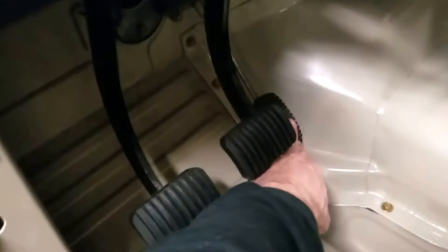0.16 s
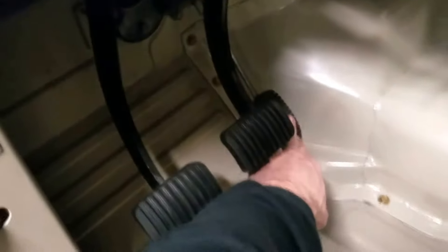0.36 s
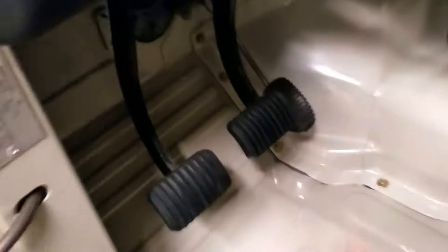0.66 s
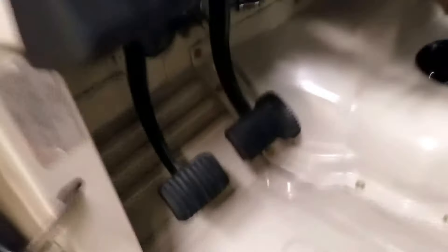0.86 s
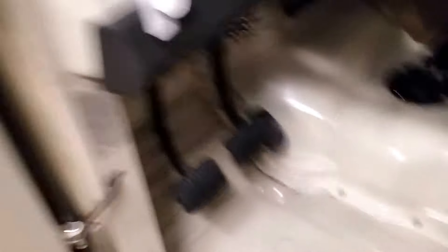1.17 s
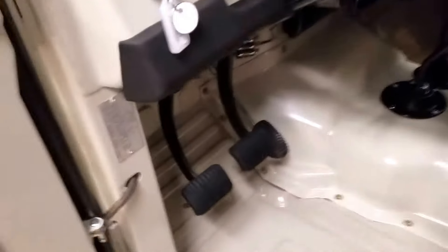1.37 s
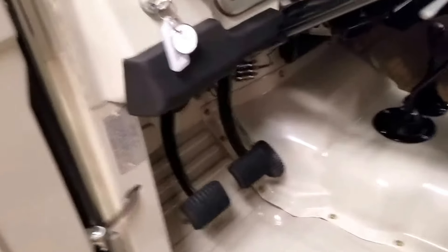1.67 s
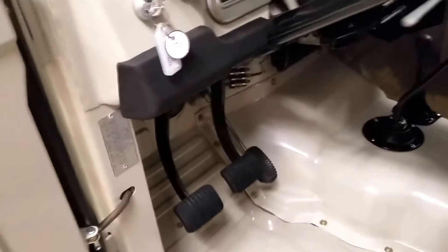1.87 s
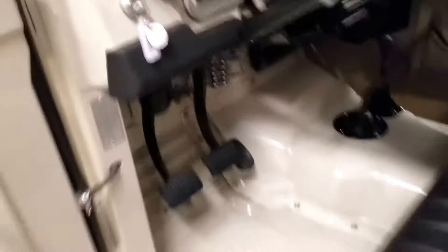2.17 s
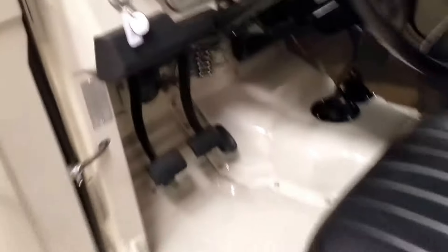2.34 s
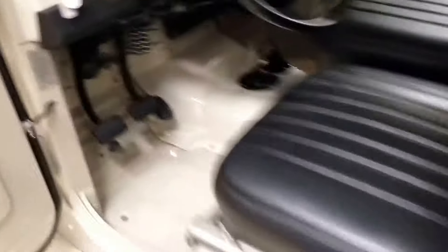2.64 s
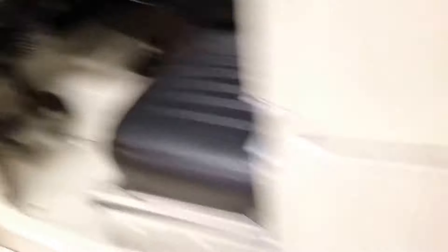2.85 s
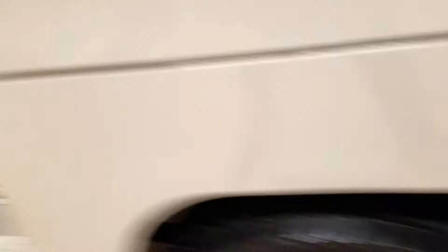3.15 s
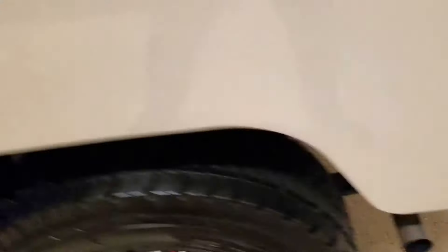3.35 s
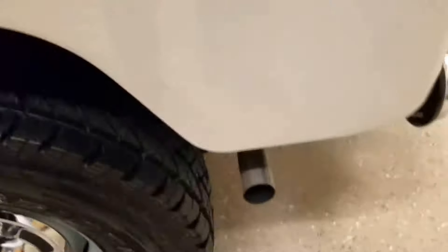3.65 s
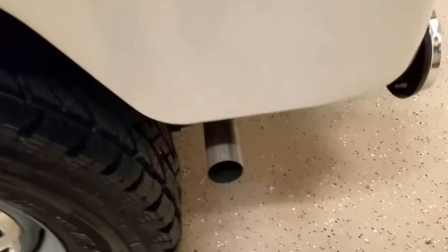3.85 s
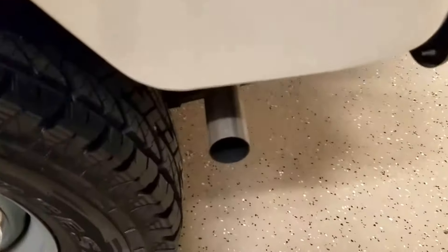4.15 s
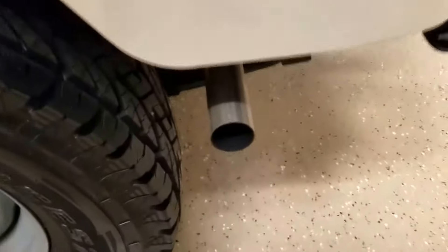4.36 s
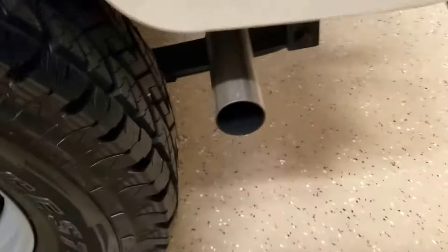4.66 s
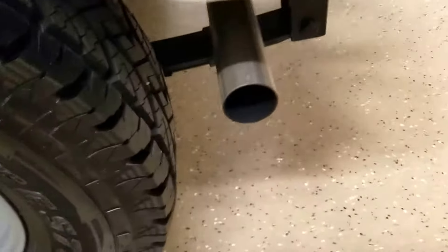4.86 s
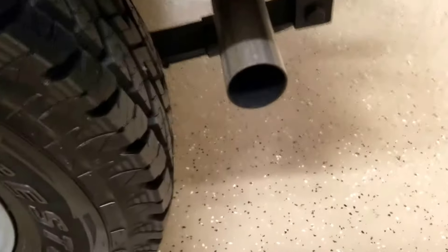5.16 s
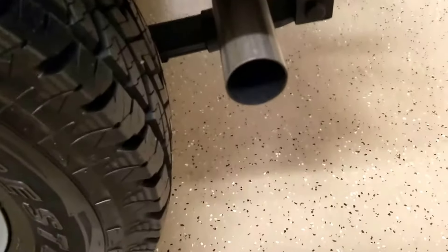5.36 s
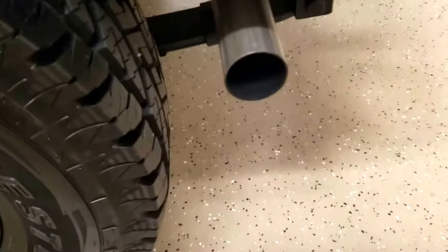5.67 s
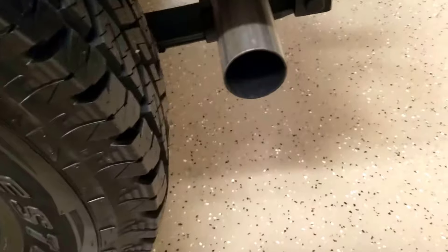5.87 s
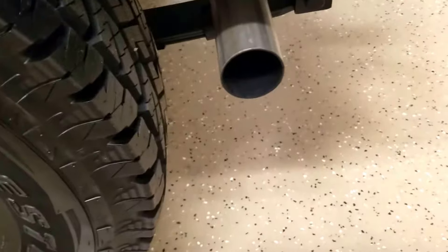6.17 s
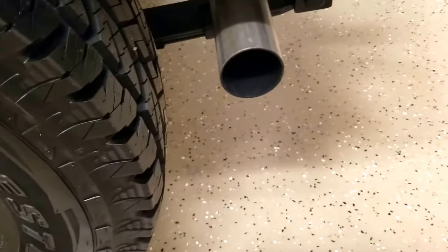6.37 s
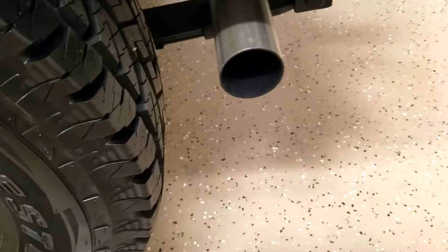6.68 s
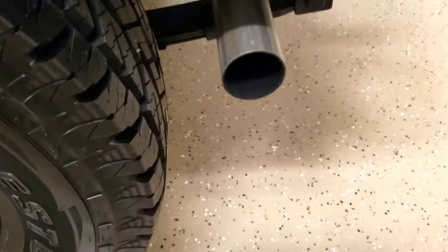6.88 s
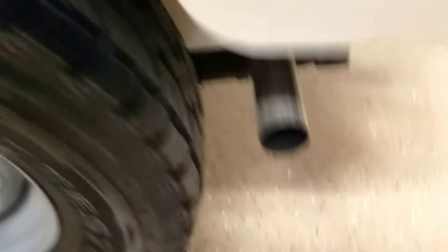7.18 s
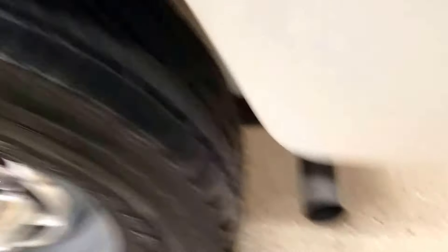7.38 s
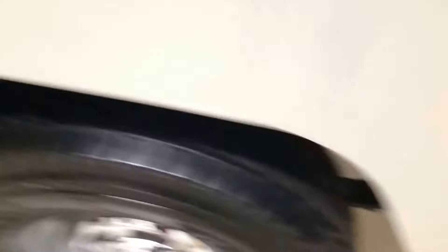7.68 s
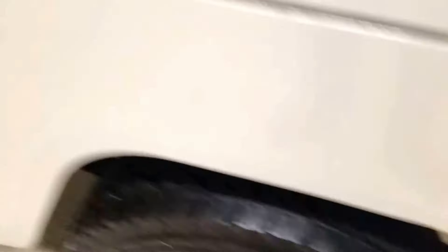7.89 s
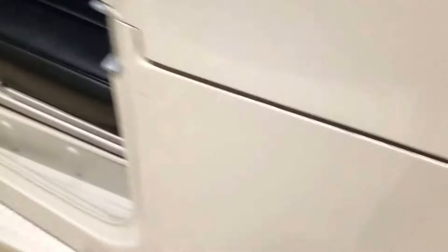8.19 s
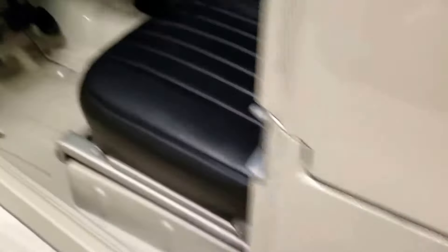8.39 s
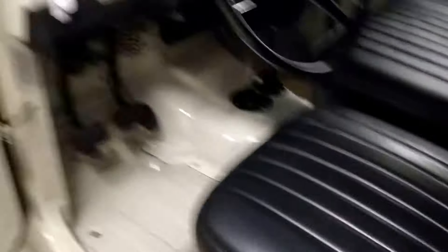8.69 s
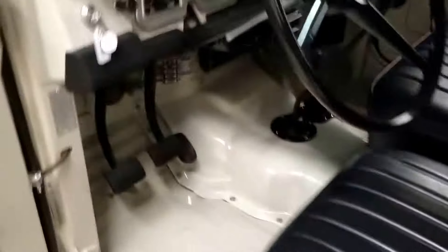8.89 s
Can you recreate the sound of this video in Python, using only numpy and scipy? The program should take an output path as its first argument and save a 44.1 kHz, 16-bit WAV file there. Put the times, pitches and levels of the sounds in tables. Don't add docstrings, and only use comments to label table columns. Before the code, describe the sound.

A hand-held stereo microphone starts in the footwell of a vehicle parked in a garage. The six-cylinder petrol engine is just above idle, then from 0.1 s revs sharply, peaking near 0.57 s with deep cabin boom, intake roar and bright air hiss. A slight dab at 0.8 s barely slows the fall; the note sags with a few weak, stumbling beats and settles to idle by about 1.7 s. As the microphone backs out, valve clatter, a fuzzy fan hum and faint alternator whine show. From 3.3 s the exhaust opens up: fast uneven puffs, hollow and whistling, with hiss and tinny shield ticks, sputtering near 3, 5 and 5.7 s. It is closest, fullest and steady from 5 to 7 s. After 7.2 s it turns away, the hiss dulls behind the body, and by 9 s the idle is more distant and clattery.

```python
import sys
import numpy as np
from scipy import signal
from scipy.fft import rfft, irfft, next_fast_len
from scipy.io import wavfile
from scipy.ndimage import map_coordinates

SR = 44100
rng = np.random.default_rng(int(sys.argv[2]) if len(sys.argv) > 2 else 0)


def generate_wav(signal):
    frames = np.transpose(np.atleast_2d(signal))
    scaled = np.clip(frames, -1, 1) * 32767
    pcm = np.round(scaled).astype(np.int16)
    wavfile.write(sys.argv[1], SR, pcm)


def volts_from_decibels(level):
    exponent = np.asarray(level, float) / 20
    return 10 ** exponent


N = 398223
TIME = np.arange(N) / SR
LEFT_RIGHT = np.array([[0.5], [-0.5]])

CYLINDER_DB = [5.5, -1.5, 5, 4, 2, 4.5]


def exhaust(fired, now):
    # (crankshaft order [cycles per turn], level beside the body [dB], level at the pipe [dB])
    boom_orders = [(4, -28, -13), (8, -35, -23), (9.5, -45, -35), (10, -17, -11), (11, -30, -14),
                   (12, -5.5, -4.5), (12.5, -38, -43), (13, -15, -4), (13.5, -26, -15), (14, -1, 0),
                   (14.5, -31, -39), (15, -2, -8.5), (15.5, -34, -43), (16, -3.5, -13), (17, -9.5, -28),
                   (18, -18, -13), (19, -25, -18), (20, -31, -23), (21, -42, -11.5), (22, -24, -18),
                   (24, -55, -27), (29, -26, -13.5), (30, -48, -13), (31, -50, -23), (33.5, -74, -46)]
    # (frequency [Hz], level per Hz [dB])
    rumble_spectrum = [(30, -22), (45, -1), (100, -37), (200, 11), (260, -1), (330, -5), (430, -5.5),
                       (600, -35.5), (900, -56)]
    shaft = 2 * np.pi * fired / 3
    near = now["aim"]
    low_db = multiples(now)
    low = volts_from_decibels(low_db[0]) * np.cos(3 * shaft)
    low += volts_from_decibels(low_db[1] + 0.4 * wobble(9)) * np.cos(6 * shaft + 1.1 * (1 - near))
    low -= volts_from_decibels(low_db[2] + 0.4 * wobble(9)) * np.cos(9 * shaft + 1.1 * (1 - near) - 0.3)

    boom = np.zeros(N)
    for order, far_db, near_db in boom_orders:
        if order % 3 == 0:
            phase = np.pi + 0.4 - 0.9 * near
        else:
            phase = 1.1 * (order - 14) - near + np.pi * (6 < order < 11.5)
        level = volts_from_decibels(far_db + near * (near_db - far_db) + 0.8 * wobble(7))
        boom += level * np.cos(order * shaft + phase + 0.12 * wobble(6))

    rumble = coloured(noise_pair(0), lambda hz: volts_from_decibels(along(rumble_spectrum, hz)), lean=0)
    boom_db = -18.5 + now["silencer_db"]
    rumble_db = -26.275 + 0.65 * now["silencer_db"]
    return np.sqrt(2) * (low + volts_from_decibels(boom_db) * boom) + volts_from_decibels(rumble_db) * rumble


def multiples(now):
    # (frequency [Hz], width [Hz], level [dB])
    footwell = [(43, 4.7, -13.5), (52.4, 6, -14), (70.4, 34, -8), (140.7, 16.5, -9), (255.7, 17, -4)]
    # (frequency [Hz], width [Hz], level [dB])
    bulkhead = [(63, 18, -4), (107, 17, -8.5), (158.7, 15, -9.5)]
    load_db = [-5.5, 0.5, -7.5]
    # (level at 1 m [dB], fall with distance [1 = spherical])
    outdoors = [(-17, 0.92), (-17.5, 1.26), (-17, 0.77)]
    # (time [s], length [s], level [dB])
    stumbles = [
        (.63, .035, -13),
        (.84, .03, -12),
        (.96, .07, -15),
        (1.23, .04, -6),
    ]
    throttle, inside = now["throttle"], now["inside"]
    levels = []
    for k, (db, fall) in enumerate(outdoors, 1):
        hz = k * now["rate"]
        cab = ring_size(footwell, hz) * volts_from_decibels(load_db[k - 1] * throttle) + 0.0053
        if k < 3:
            cab = cab + throttle ** 2 * ring_size(bulkhead, hz)
        cab_db = 20 * np.log10(cab) + 3 * (1 - 0.47 * throttle) * wobble(19)
        if k == 1:
            cab_db = cab_db + bumps(stumbles)
        levels.append(inside * cab_db + (1 - inside) * (db + fall * now["pipe_db"]))
    return levels


def ring_size(table, hz):
    return sum(np.abs(modes([row])(hz)) for row in table)


def tailpipe(fired, now):
    ring_1 = [(1047, 70, 0)]
    ring_2 = [(2099, 90, 0)]
    ring_aslant = [(2282, 130, 0), (1958, 185, 1), (2260, 500, -5)]
    hollow_modes = [(503, 114, -6.5), (588, 43, -2), (644.6, 23, -1.5), (686, 29, -2), (812.4, 41, -2),
                    (1648, 37, -5)]
    lip_modes = [(3497, 440, -3), (4200, 920, 0), (5120, 620, -2.5)]
    arch_modes = [(3296, 170, 7), (3790, 950, 2.5), (2710, 590, 5.5)]
    shield_modes = [(7360, 850, 11), (7850, 420, 12), (11300, 6100, 5), (14000, 2500, -27)]
    # (level at 1 m [dB], fall with distance [1 = spherical],
    # change out of sight [dB], change in the footwell [dB])
    pipe_layers = [
        (-23, 1, -3.5, -20.5),
        (-25, 0.84, -3, -13),
        (-33.5, 0.96, 2.5, -38),
        (-50, 0.59, 1.5, -35),
    ]
    # (time [s], length [s], level [dB])
    sputters = [(3.0, .1, 6), (3.3, 0.16, 3), (4.95, 0.13, 6.5), (5.7, 0.18, 0), (7.15, 0.092, 4)]

    near = now["aim"]
    hidden = np.clip(1 - near / 0.4, 0, 1)
    layer_db = []
    for db, fall, hide_db, cab_db in pipe_layers:
        layer_db.append(db + fall * now["pipe_db"] + hide_db * hidden + cab_db * now["inside"])
    first_db, second_db, hiss_db, tick_db = layer_db
    hiss_db = hiss_db + 0.17 * bumps(sputters)
    tick_db = tick_db + bumps(sputters)

    gate = puffs(fired, opens=0.1, rise=0.2, decay=0.6, scatter_db=5, depth=0.55)
    breath = gate * coloured(noise_pair(0.1), modes(hollow_modes), lean=0.3)
    hollow = 0.5 * breath + 0.87 * coloured(blowdown(fired), modes(hollow_modes), lean=0.3)

    gate = puffs(fired, opens=0.35, rise=0.3, decay=0.6, scatter_db=3.5, depth=0.62)
    first = gate * whistle(ring_1, wander=1.9, steady=0.75)

    gate = puffs(fired, opens=0.45, rise=0.25, decay=0.5, scatter_db=4, depth=0.62)
    aslant = volts_from_decibels(0.5 - 7.4 * near) * coloured(noise_pair(0.073), modes(ring_aslant))
    second = gate * (whistle(ring_2, wander=1.73, steady=0.35) + aslant)

    lip = sum(volts_from_decibels(row[2]) * coloured(eddy(fired), modes([row]), lean=2.8) for row in lip_modes)
    round_body = coloured(eddy(fired), modes(arch_modes))
    hiss = near * volts_from_decibels(-5.5) * lip + (1 - near) * round_body

    gate = puffs(fired, opens=0.55, rise=0.08, decay=0.35, scatter_db=7, depth=1)
    ticks = coloured(gate * noise_pair(0.4), modes(shield_modes))

    rings = volts_from_decibels(first_db - 8 + 1.9 * near) * hollow + volts_from_decibels(first_db - 2) * first + volts_from_decibels(second_db - 1.5) * second
    return rings + volts_from_decibels(hiss_db) * hiss + volts_from_decibels(tick_db) * ticks


def blowdown(fired):
    cylinder_late = [0.0043, 0.056, -0.055, 0.0106, 0.0805, -0.041]
    which = np.arange(1, int(fired[-1]))
    chance = rng.standard_normal((len(which), 2))
    opening = which + 0.4 + np.take(cylinder_late, which % 6) + 0.004 * chance[:, 0]
    at = np.searchsorted(fired, opening)
    size = volts_from_decibels(3.7 * np.take(CYLINDER_DB, which % 6) + 0.56 * chance[:, 1])
    pulses = np.bincount(at, size, N)[:N]
    return ports(np.array([pulses, pulses]))


def whistle(ring, wander, steady):
    tone = np.cos(2 * np.pi * ring[0][0] * TIME + wander * wobble(45))
    tone = coloured(ports(np.array([tone, tone])), lambda hz: 1)
    return steady * tone + np.sqrt(1 - steady ** 2) * coloured(noise_pair(0.77), modes(ring))


def eddy(fired):
    gate = puffs(fired, opens=0.5, rise=0.4, decay=1.1, scatter_db=7, depth=0.65)
    return gate * volts_from_decibels(1.5 * wobble(12)) * noise_pair(0.4)


def puffs(fired, opens, rise, decay, scatter_db, depth):
    turn = fired - opens + 1
    which = turn.astype(int)
    chance = rng.uniform(-1, 1, which.max() + 1)[which]
    size_db = np.take(CYLINDER_DB, which % 6) + scatter_db * chance
    u = turn % 1
    gate = volts_from_decibels(size_db) * (1 - np.exp(-(u / rise) ** 2)) * np.exp(-u / decay) * (1 - u ** 6)
    return np.clip(1 - depth, 0, 1) + depth * unit(gate)


def engine_bay(fired, now):
    # (frequency [Hz], level per Hz [dB])
    clatter_spectrum = [(180, -2), (300, -13.5), (405, -6.5), (520, -9.5), (680, -10), (760, -11.5),
                        (830, -6.5), (920, -12.5), (1180, -10), (1440, -16), (1600, -11), (2070, -14),
                        (3170, -20), (6000, -30.5)]
    air_spectrum = [(3000, -11), (5000, -2), (5900, -3.5), (7200, -1), (8200, -6), (9300, -8.5),
                    (11000, -5.5), (13000, -2.5), (15000, -0.5), (15900, -4.5)]
    # (frequency [Hz], width [Hz], level [dB])
    intake_modes = [(250, 69, -2), (467, 43, -0.5), (644, 52, -1.5), (810, 290, -8.5), (1410, 170, -7),
                    (2550, 510, -17)]
    throttle, revs = now["throttle"], now["revs"]

    gate = puffs(fired, opens=0.28, rise=0.28, decay=0.11, scatter_db=-1, depth=0.14)
    clatter = coloured(volts_from_decibels(0.56 * wobble(12)) * gate * noise_pair(0),
                       lambda hz: volts_from_decibels(along(clatter_spectrum, hz)) / (1 + (hz / 7000) ** 4), lean=0.64)
    clatter_db = -25.5 + 4 * revs ** 0.5

    depth = 0.26 * (1 - 0.92 * throttle)
    gate = puffs(fired, opens=0.59, rise=0.051, decay=0.93, scatter_db=15, depth=depth)
    air = coloured(volts_from_decibels(0.34 * wobble(2.7)) * gate * noise_pair(-0.0056),
                   lambda hz: volts_from_decibels(along(air_spectrum, hz)), lean=0.18)
    air_db = -43 + 11 * throttle - 4 * now["inside"]

    gate = puffs(fired, opens=0.044, rise=0.066, decay=0.66, scatter_db=13, depth=0.41)
    roar = coloured(gate * noise_pair(0), modes(intake_modes), lean=0.3)
    roar_level = volts_from_decibels(-25.5 + 4.8 * throttle) * revs ** 1.2
    return volts_from_decibels(clatter_db) * clatter + volts_from_decibels(air_db) * air + roar_level * roar


def accessories(fired, now):
    # (crankshaft order [cycles per turn], level [dB])
    fan_orders = [(26, -10), (26.5, -12.5), (27, 1.5), (28, -5.5), (29.5, -37)]
    # (time [s], length [s], level [dB])
    fan_nulls = [(.36, 0.16, -13.5), (1.75, 0.56, -11.5), (2.3, 0.41, -2), (3.45, 0.25, -12.5),
                 (7.5, 0.38, -5), (8.8, 0.61, -5)]
    shaft = 2 * np.pi * fired / 3
    inside, revs = now["inside"], now["revs"]

    ragged = np.sqrt(np.clip(now["rate"] / 46 - 1, 0, 1))
    fan = 0
    for order, db in fan_orders:
        level = volts_from_decibels(db + 2 * wobble(8) + 5 * ragged * wobble(25))
        phase = order * shaft + 0.25 * wobble(8) + 2.2 * ragged * wobble(45)
        fan = fan + level * np.exp(1j * phase)
    fan_db = -25 + bumps(fan_nulls) - 3 * inside + 3 * revs

    creep = 2 * np.pi * np.cumsum(16 * np.clip(TIME - 8.1, 0, 1)) / SR
    whine = volts_from_decibels(3 * wobble(10)) * np.exp(1j * (81 * shaft + creep + 0.9 * wobble(22)))
    whine_db = -44.5 - 1.1 * now["pipe_db"] - 18 * now["aim"] - 18 * revs - 3 * inside

    apart = np.exp(1j * 1.16 * wobble(3) * LEFT_RIGHT)
    return np.real(apart * (volts_from_decibels(fan_db) * fan + volts_from_decibels(whine_db) * whine))


def controls():
    # (time [s], firing rate [Hz])
    speed = [(0, 46.8), (.14, 48.8), (.33, 66.5), (.5, 79.3), (.57, 82.8), (.66, 75.8), (.8, 70.8),
             (.98, 62), (1.13, 54.2), (1.3, 49.2), (1.54, 45.2), (1.75, 43.8), (2.3, 43.4), (3.3, 43.4),
             (4, 44.15), (5.6, 44.42), (7.6, 44.25), (9.03, 44.5)]
    # (time [s], hold [s], throttle [0-1])
    blips = [
        (0.07, 0.405, 0.93),
        (0.79, 0.035, 0.16),
    ]
    # (time [s], distance to pipe end [m], distance to silencer [m],
    # looking into the pipe [0-1], left-right turn [dB])
    walk = [(0, 3, 5.7, 0.44, 1), (1.1, 1.8, 8.6, 0, 0.5), (1.45, 9, 3.5, 0.7, 0.5),
            (2.1, 5.3, 3, 0.6, 0.5), (2.45, 4.7, 1.38, 0.16, -2), (2.8, 2.5, 1.12, 0, -1.5),
            (3.22, 2.05, 0.95, 0, 1), (3.33, 1.44, 1.12, 0.6, 0), (3.7, 1.3, 1.38, 0.8, 0),
            (4.3, 1.17, 1.4, 1, .8), (5, 1.06, 1.03, 0.95, 0.7), (7, 0.99, 0.92, 0.92, 0.6),
            (7.55, 1.28, 1.18, 0.6, 0), (7.9, 1.97, 1.27, .15, .3), (8.3, 2.33, 1.07, 0.04, -0.5),
            (9.03, 4, 1.66, 0, -2.5)]
    open_s, shut_s = 0.11, 0.12
    leaves_s, clear_s = 1.06, 2.03
    rate, = curves(speed)
    pipe_m, silencer_m, aim, turn_db = curves(walk)
    throttle = np.zeros(N)
    for s, hold, depth in blips:
        pressing = (TIME - s) / open_s
        releasing = (s + open_s + hold - TIME) / shut_s + 1
        throttle += depth * np.clip(np.minimum(pressing, releasing), 0, 1)
    return dict(
        rate=rate,
        revs=np.clip((rate - 44.6) / 38, 0, 1),
        throttle=throttle,
        aim=np.clip(aim, 0, 1),
        turn_db=turn_db,
        pipe_db=-20 * np.log10(np.abs(pipe_m)),
        silencer_db=-20 * np.log10(np.abs(silencer_m)),
        inside=np.clip((clear_s - TIME) / (clear_s - leaves_s), 0, 1))


def noise_pair(alike_shift):
    # (frequency [Hz], likeness [0-1])
    alike = [(60, 0.96), (250, 0.48), (500, 0.77), (1000, 0.14), (2000, 0.067), (4000, 0.15), (8000, 0.17),
             (15000, 0.13)]

    def shares(hz):
        angle = np.arccos(np.clip(along(alike, hz) + alike_shift, 0, 1)) / 2
        return np.array([np.cos(angle), np.sin(angle)])

    mid, side = filtered(rng.standard_normal((2, N)), shares)
    return ports(np.array([mid + side, mid - side]))


def ports(pair):
    # (frequency [Hz], phase [rad])
    lead = [(0, 0), (1120, -0.0), (1890, 7.2), (3190, 10.1), (4050, 13.8), (5000, 14.6), (7750, 21.2),
            (9220, 22.0), (14300, 33.4), (16200, 36.4)]
    return filtered(pair, lambda hz: np.exp(1j * np.interp(hz, *np.transpose(lead)) * LEFT_RIGHT))


def coloured(x, spectrum, lean=1):
    # (frequency [Hz], level [dB])
    port_lean = [(60, -20), (130, 7), (290, -8), (640, 3.5), (1410, -10), (3100, -5.5), (6820, -1.5),
                 (15000, 17.5)]
    y = filtered(x, lambda hz: spectrum(hz) * volts_from_decibels(lean * along(port_lean, hz) * LEFT_RIGHT))
    return y / np.sqrt(np.mean(y.mean(axis=0) ** 2))


def modes(table):
    def response(f):
        total = 0
        for centre, width, db in table:
            ring = 1j * f * width / (centre * centre - f * f + 1j * f * width)
            total = total + volts_from_decibels(2 * db) * ring ** 2
        return total
    return response


def filtered(x, response):
    m = next_fast_len(N + 8192)
    return irfft(rfft(x, m) * response(np.fft.rfftfreq(m, 1 / SR)), m)[..., :N]


def wobble(rate):
    knots = rng.standard_normal(int(N * rate / SR) + 4)
    return map_coordinates(knots, [TIME * rate], order=3)


def bumps(rows):
    return sum(db * np.exp(-((TIME - s) / length) ** 2) for s, length, db in rows)


def curves(rows):
    s, *columns = np.transpose(rows)
    return [np.interp(TIME, s, column) for column in columns]


def along(points, hz):
    f, v = np.transpose(points)
    return np.interp(np.log(hz + 1), np.log(f + 1), v)


def unit(x):
    return x / np.sqrt(np.mean(x ** 2) + 1e-20)


def scene():
    now = controls()
    fired = np.cumsum(now["rate"] * (1 + 0.002754 * wobble(5))) / SR
    pan = volts_from_decibels(now["turn_db"] * LEFT_RIGHT)
    bass_and_whine = pan * (exhaust(fired, now) + accessories(fired, now))
    return bass_and_whine + tailpipe(fired, now) + engine_bay(fired, now)


def band_limit(x):
    return signal.sosfilt(signal.butter(12, 16580, fs=SR, output="sos"), x)


def record(dry):
    rounded = dry / (1 + np.abs(dry / 1.05) ** 8) ** (1 / 8)
    limited = filtered(rounded, lambda hz: (hz < 15960) / np.sqrt(1 + (34 / (hz + 1)) ** 12))
    return band_limit(limited)


dry = scene()
out = record(dry)
generate_wav(out)
```